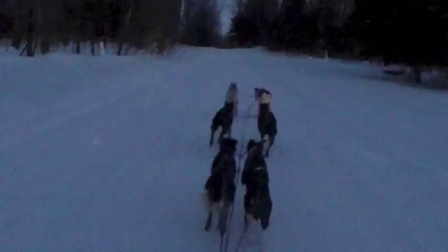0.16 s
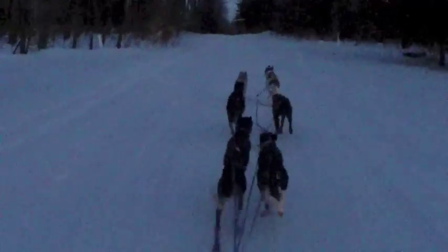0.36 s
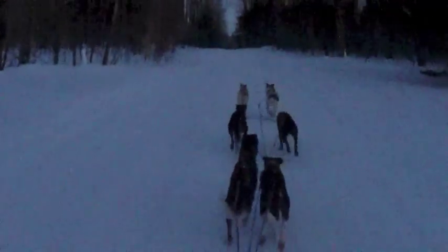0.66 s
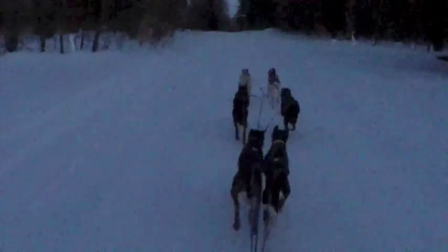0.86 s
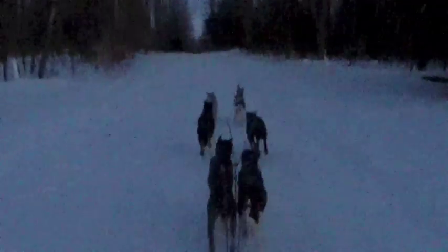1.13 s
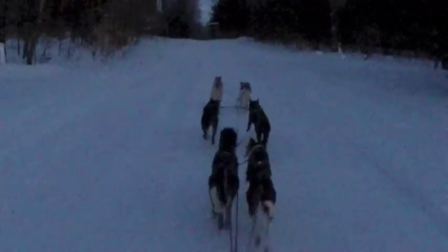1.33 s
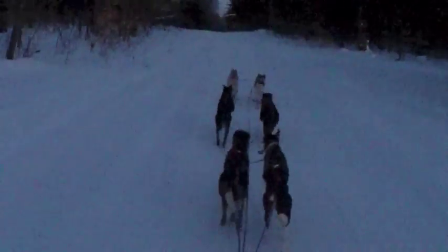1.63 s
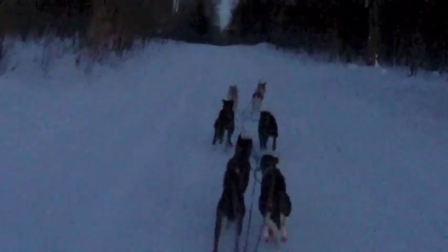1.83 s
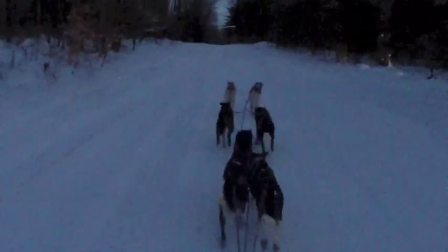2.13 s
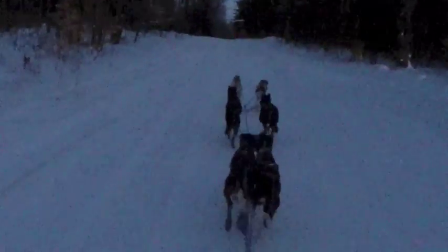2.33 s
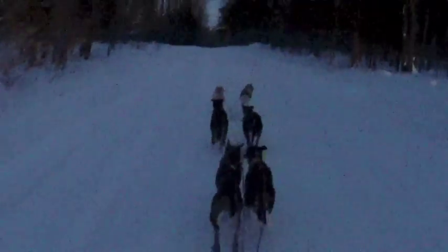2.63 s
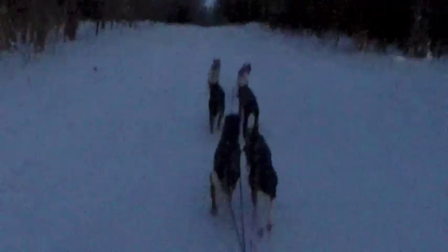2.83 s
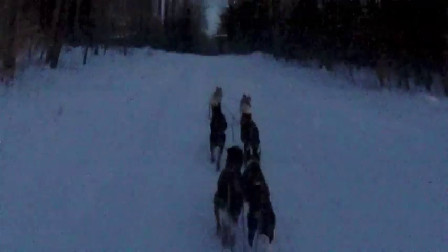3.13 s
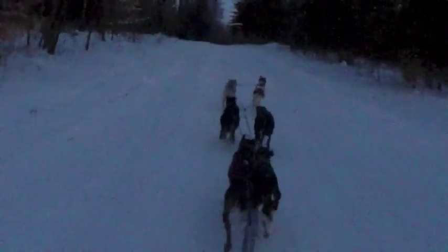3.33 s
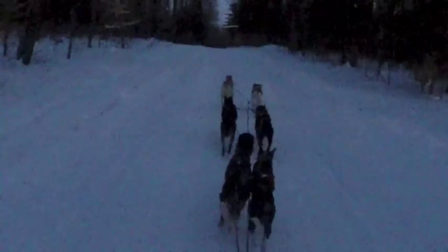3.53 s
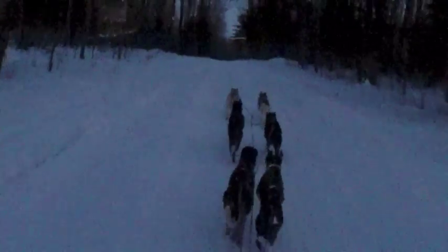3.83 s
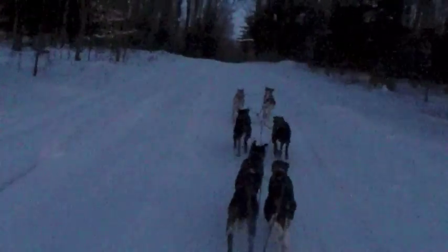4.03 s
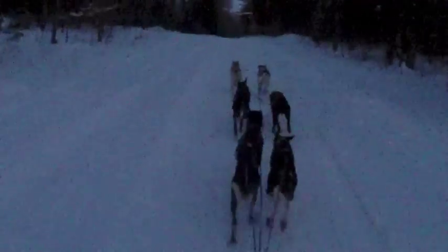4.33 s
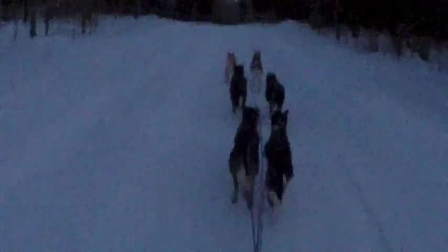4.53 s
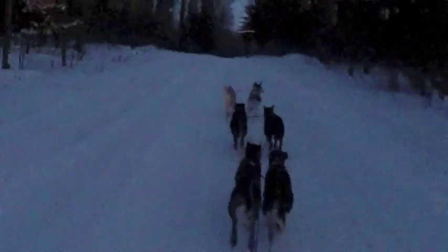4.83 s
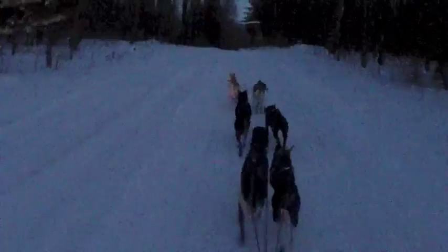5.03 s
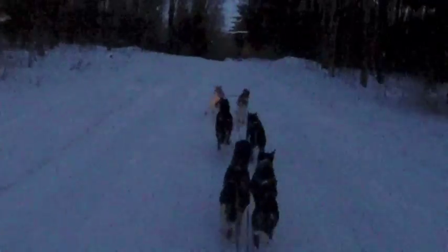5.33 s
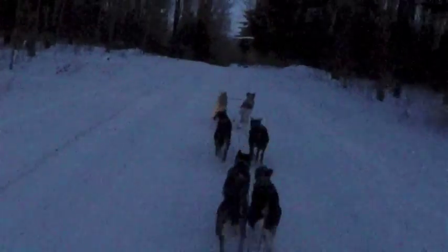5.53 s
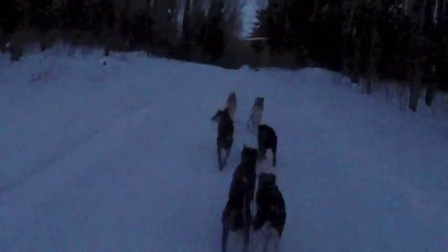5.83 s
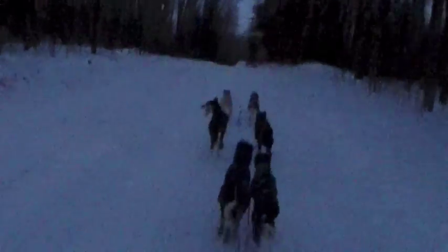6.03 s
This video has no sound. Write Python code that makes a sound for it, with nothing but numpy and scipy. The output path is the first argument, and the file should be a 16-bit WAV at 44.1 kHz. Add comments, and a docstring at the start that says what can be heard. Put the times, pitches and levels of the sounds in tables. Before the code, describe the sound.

A sled glides over snow with a grainy hiss, wind buffeting the microphone, small squeaks and a few hard, close clicks.

```python
"""A dog sled's runners hiss over packed snow, heard from the sled itself.
Paws kick up loose snow, the crust crunches, and the shaken frame hums and squeaks at its joints.
Behind it all, rushing air rumbles on the microphone and swells at each rut. Four hard clicks of the
rigging strike close by; the loudest makes the camera turn its volume down, then slowly back up."""
import sys
import numpy as np
from scipy import signal
from scipy.fft import rfft, irfft, next_fast_len
from scipy.io import wavfile
from scipy.ndimage import uniform_filter1d, minimum_filter1d, map_coordinates

SR = 44100
rng = np.random.default_rng(int(sys.argv[2]) if len(sys.argv) > 2 else 0)


def put_to_file(sound):
    """Save the sound as 16-bit audio at rate SR, in the file named by the first command-line argument."""
    columns = np.atleast_2d(sound).T  # one column per channel
    safe = np.clip(columns, -1, 1)
    whole_steps = np.round(safe * 32767)
    wavfile.write(sys.argv[1], SR, whole_steps.astype(np.int16))


N = 272083


def amp(db):
    """Turn decibels into a number to multiply a sound by."""
    return 10 ** (np.asarray(db) / 20)


def unit(x):
    """Scale a sound to an average (rms) level of 1."""
    return x / np.sqrt(np.mean(x ** 2) + 1e-20)


def noise():
    """White noise: an even hiss."""
    return rng.standard_normal(N)


def wobble(rate):
    """A smooth curve through random values, `rate` of them a second."""
    return map_coordinates(rng.standard_normal(int(N * rate / SR) + 4), [np.arange(N) * rate / SR])


def filtered(x, response):
    """Turn each frequency of x up or down by response(hz)."""
    size = next_fast_len(N + SR // 2)
    return irfft(rfft(x, size) * response(np.fft.rfftfreq(size, 1 / SR)), size)[:N]


def along(tone, hz):
    """Read the gain at hz from a (frequency [Hz], level [dB]) table."""
    table_hz, db = np.transpose(tone)
    return amp(np.interp(np.log(hz + 1), np.log(table_hz + 1), db))


def coloured(x, tone):
    """Give x the tone in a table, at an average level of 1."""
    return unit(filtered(x, lambda hz: along(tone, hz)))


def grains(rate, spread_db):
    """Snow crystals breaking: random ticks of uneven size, `rate` a second."""
    return unit((rng.random(N) < rate / SR) * noise() * amp(spread_db * noise()))


def add(track, start_s, sound):
    """Mix a sound into the track at start_s."""
    part = track[round(start_s * SR):][:len(sound)]
    part += sound[:len(part)]


def swells(events):
    """A loudness curve in which each event rises quickly and fades more slowly."""
    out, t = np.zeros(N), np.arange(SR // 3) / SR
    for start_s, db, rise_s in events:
        add(out, start_s, amp(db) * t / rise_s * np.exp(1 - t / rise_s))
    return out


# The deep tone of rushing air: (frequency [Hz], level [dB])
AIR_TONE = [(8, -7.5), (30, 0.5), (45, -1), (53, 2), (66, -8.5), (90, -23), (200, -26.5), (500, -59.5)]
def wind(level_db, gust_db):
    """Air beats on the microphone in uneven gusts."""
    return amp(level_db + gust_db * wobble(22)) * coloured(noise(), AIR_TONE)


# The sled drops into ruts: (time [s], level [dB], rise time [s])
RUTS = [(0.738, -30.5, 0.017), (0.85, -25, 0.036), (0.97, -27, 0.017), (1.12, -30.5, 0.037),
        (1.575, -28, 0.02), (2.47, -36.5, .03), (2.69, -26.5, 0.026), (3.13, -27.5, 0.032),
        (3.465, -26.5, 0.021), (3.73, -26.5, 0.038), (3.99, -30, 0.029), (4.475, -28, 0.02),
        (4.59, -30, 0.041)]
def ruts(bounce_db, bounce_hz, waver_cycles, air_db):
    """Each rut bounces the sled a few times and jerks the microphone through the air."""
    bounce = np.sin(2 * np.pi * (bounce_hz * np.arange(N) / SR + waver_cycles * wobble(25)))
    air = coloured(noise(), AIR_TONE)
    return swells(RUTS) * (amp(bounce_db) * bounce + amp(air_db) * air)


# The low rumble of the trail: (frequency [Hz], level [dB])
TRAIL_TONE = [(40, -9), (70, 6.5), (110, 1.5), (200, -5.5), (270, -6.5), (520, -8.5), (720, -6.5),
              (820, -24.5), (2000, -48)]
# The notes the frame rings at: (pitch [Hz], width [Hz], level [dB])
FRAME_NOTES = [(146.3, 11.5, 6.5), (199, 26.3, 3.5), (401, 29, 1.5), (605, 34, 4.5), (649, 38, 2),
               (712, 21.7, 7)]
def frame_hum(level_db, trail_db):
    """The rough trail shakes the sled, which hums at its own natural notes."""
    def response(hz):
        notes = sum((-1) ** k * amp(db) * 1j * hz * width / (pitch ** 2 - hz ** 2 + 1j * hz * width)
                    for k, (pitch, width, db) in enumerate(FRAME_NOTES))
        return notes / np.sqrt(1 + (hz / 770) ** 24)  # fades fast above 770 Hz
    hum = unit(filtered(noise(), response))
    return amp(level_db) * (hum + amp(trail_db) * coloured(noise(), TRAIL_TONE))


# The high hiss of flying snow: (frequency [Hz], level [dB])
SPRAY_TONE = [(1500, -24), (2800, -16.5), (3750, -7), (4100, -1.5), (4800, 1), (5650, -2.5), (6300, -7.5),
              (7900, -13.5), (9000, -14.5), (10000, -10), (10900, -23), (12000, -15), (13500, -47),
              (15000, -75)]
def paw_spray(level_db, kicks_per_s, kick_db, drift_cycles, clump_db):
    """Paws kick up clumps of snow in a loose rhythm."""
    crystals = coloured(noise() + grains(rate=1800, spread_db=2), SPRAY_TONE)
    kicks = np.cos(2 * np.pi * (kicks_per_s * np.arange(N) / SR + drift_cycles * wobble(2.37)))
    return amp(level_db + kick_db * kicks + clump_db * wobble(45)) * crystals


# The tone of breaking snow crust: (frequency [Hz], level [dB])
CRUST_TONE = [(1200, -8), (2400, 7), (3700, 0.5), (5200, 3.5), (7500, -20.5), (10000, -12.5), (15000, -42)]
# The bigger breaks in the crust: (time [s], level [dB], rise time [s])
CRUST_BREAKS = [(0.772, -43, 0.0068), (0.986, -41, 0.014), (1.118, -46.5, .03), (1.92, -47, .03),
                (2.17, -48.5, 0.049), (2.350, -37.5, 0.0067), (2.665, -44, .018), (2.835, -41, .017),
                (3.090, -47, 0.033), (3.59, -54, 0.016), (3.80, -48.5, 0.018), (4.09, -44.5, 0.037),
                (4.565, -44.5, 0.029), (5.93, -46, 0.014)]
def crunches(boost_db, scrapes_per_s, scrape_db, spread_db, scrape_rise_s):
    """The crust gives way under paws and runners, with small scrapes at random times."""
    crust = coloured(grains(rate=6000, spread_db=-2.5), CRUST_TONE)
    draws = rng.random((round(scrapes_per_s * N / SR), 2))
    scrapes = [(when * N / SR, scrape_db + spread_db * (1 - 2 * softness), scrape_rise_s)
               for when, softness in draws]
    return amp(boost_db) * np.hypot(swells(CRUST_BREAKS), swells(scrapes)) * crust


# The frame's joints slip: (time [s], level [dB], pitch [Hz], roughness [0-1])
JOINT_SLIPS = [(1.003, -33.5, 2170, 0.07), (3.889, -35.5, 2350, 0.08), (4.048, -28.5, 2377, 0.01),
               (4.173, -37, 2170, 0.05), (4.477, -39, 2390, .18), (5.42, -39.5, 2480, .2),
               (5.782, -35, 2164, 0.1), (5.892, -33.5, 2126, 0.07), (6.033, -34.5, 2206, 0.06),
               (6.093, -38.5, 2160, 0.09), (6.132, -39, 2490, 0.04)]
def squeaks(boost_db, rise_s):
    """A joint slips for a moment and gives a short, rough chirp."""
    out, t = np.zeros(N), np.arange(SR // 12) / SR
    swell = (t / rise_s * np.exp(1 - t / rise_s)) ** 2
    for start_s, db, hz, roughness in JOINT_SLIPS:
        phase = 2 * np.pi * hz * t + roughness * np.cumsum(rng.standard_normal(len(t)))
        add(out, start_s, amp(db + boost_db) * swell * np.sin(phase))
    return out


# The notes of a small rigging part: (pitch [Hz], level [dB], time to fade by 60 dB [s])
PART_NOTES = [(1615, -11, 0.016), (1840, -33.5, 0.17), (2070, -4, 0.02), (2290, -1.5, 0.016),
              (3200, -18, 0.014), (3660, -16, 0.016), (4290, -25.5, 0.023), (4870, -26, 0.026),
              (5430, -15, 0.0099)]
# The bright snap as parts meet: (frequency [Hz], level [dB])
SNAP_TONE = [(600, -25), (1300, -1), (3500, 13.5), (5500, -1), (7200, -3.5), (8300, -0.5), (9700, -2),
             (11200, 0), (12200, -4), (14500, 3.5)]
# The rigging strikes: (time [s], level [dB], rise time [s], high knock [Hz], low knock [Hz],
# low knock level [dB], ring level [dB], snap level [dB], thud level [dB])
STRIKES = [(0.1066, 13.5, 0.0005, 2150, 1720, -3, -3.5, -9, -15),
           (1.678, -11.5, 0.00047, 2446, 1560, -2, -5.5, -41, -7),
           (4.2873, 5.5, 0.0017, 2190, 1166, -12, -3, -22.5, -23),
           (5.5227, 1, 0.0021, 2680, 1463, -3.5, -5, -55, -22.5)]
def rigging_clicks(high_fade_s, low_fade_s, snap_fade_s, thud_hz, thud_fade_s):
    """Each strike makes two short knocks, a small part's ring, a snap and a dull thud in the frame."""
    out, snaps = np.zeros((2, N))
    t = np.arange(SR // 6) / SR
    def note(hz, db, fade_s):
        return amp(db - 60 * t / fade_s) * np.sin(2 * np.pi * hz * t)
    for start_s, db, rise_s, high_hz, low_hz, low_db, ring_db, snap_db, thud_db in STRIKES:
        knocks = note(high_hz, 0, high_fade_s) + note(low_hz, low_db, low_fade_s)
        ring = amp(ring_db) * sum(note(*row) for row in PART_NOTES)
        press = 1 - np.exp(-(t / rise_s) ** 2)  # a softer hit swells more slowly
        # so small a part gives off hardly any sound below its lowest note
        low_cut = signal.butter(4, .85 * low_hz, "highpass", fs=SR, output="sos")
        click = signal.sosfilt(low_cut, press * (knocks + ring))
        add(out, start_s, amp(db) * (click + note(thud_hz, thud_db, thud_fade_s)))
        add(snaps, start_s, amp(db + snap_db - 60 * t / snap_fade_s) * rng.standard_normal(len(t)))
    return out + filtered(snaps, lambda hz: along(SNAP_TONE, hz))


# The hiss of runners on snow: (frequency [Hz], level [dB])
RUNNER_TONE = [(500, -22.5), (850, -19.5), (1200, -18.5), (1400, -7.5), (1920, -5.5), (2080, 0.5),
               (2280, -4), (2540, 1.5), (2700, -5), (3450, -9.5), (3800, -20), (6000, -36)]
def runners(level_db, flutter_db):
    """The runners scrape the packed snow: a thick, grainy hiss that flutters."""
    hiss = coloured(noise() + grains(rate=2500, spread_db=0), RUNNER_TONE)
    return amp(level_db + flutter_db * wobble(45)) * hiss


# How hard the runners bite into the snow: (time [s], level [dB])
RUNNER_BITE = [(0.75, -40.5), (0.82, -41), (1.29, -41), (3.87, -42), (4.03, -41.5), (5.11, -43.5),
               (5.29, -43), (6.03, -42.5), (6.17, -42.5)]
def scene():
    """The steady sounds grow louder as the runners bite harder; the snow gives no echo."""
    bite_db = np.interp(np.arange(N) / SR, *np.transpose(RUNNER_BITE))
    bite_db -= bite_db.mean()  # keep only the swings around the average
    mix = wind(-43 + 0.63 * bite_db, gust_db=2.2)
    mix += ruts(bounce_db=-5, bounce_hz=49.2, waver_cycles=0.182, air_db=-9)
    mix += frame_hum(-50.5 + 0.68 * bite_db, trail_db=-0.5)
    mix += paw_spray(-51.5 + 0.34 * bite_db, kicks_per_s=4.68, kick_db=0.5,
                     drift_cycles=0.42, clump_db=0.62)
    mix += crunches(boost_db=0.75, scrapes_per_s=8.5, scrape_db=-52.5,
                    spread_db=1.5, scrape_rise_s=0.0058)
    mix += squeaks(boost_db=2.5, rise_s=0.0052)
    mix += rigging_clicks(high_fade_s=0.013, low_fade_s=0.014, snap_fade_s=0.0074,
                          thud_hz=524, thud_fade_s=0.0026)
    mix += runners(-42.5 + bite_db, flutter_db=0.84)
    return mix[None]


def auto_volume(x, ceiling_db, recover_db_per_s):
    """The volume drops just before a sound that is too loud, then creeps back up."""
    level_db = 10 * np.log10(np.abs(uniform_filter1d(x ** 2, size=SR // 500)) + 1e-12)
    drop_db = minimum_filter1d(np.minimum(0, ceiling_db - level_db), size=SR // 45)
    climb_db = recover_db_per_s * np.arange(N) / SR
    gain_db = np.minimum.accumulate(drop_db - climb_db) + climb_db
    return x * amp(uniform_filter1d(gain_db, size=SR // 300))


def record(dry):
    """The camera turns loud sounds down, flattens peaks that are still too big and cuts the top treble."""
    held = auto_volume(dry[0], ceiling_db=-4, recover_db_per_s=18.5)
    top_hz = 15000
    return filtered(np.clip(held, -1, 1), lambda hz: 1 / np.sqrt(1 + (hz / top_hz) ** 120))[None]


dry = scene()
out = record(dry)
put_to_file(out)
```